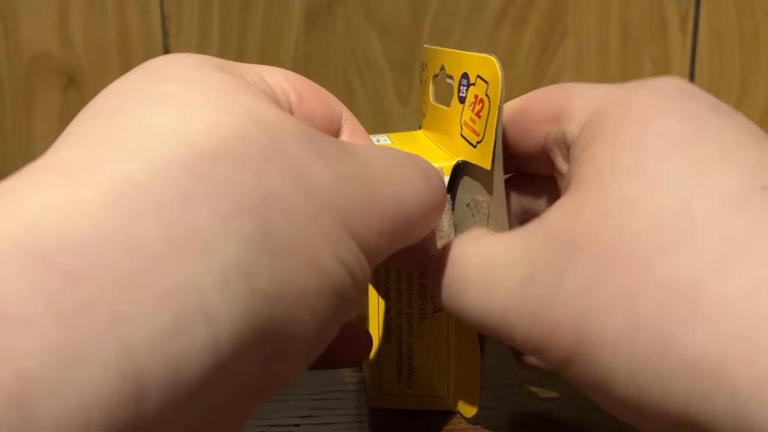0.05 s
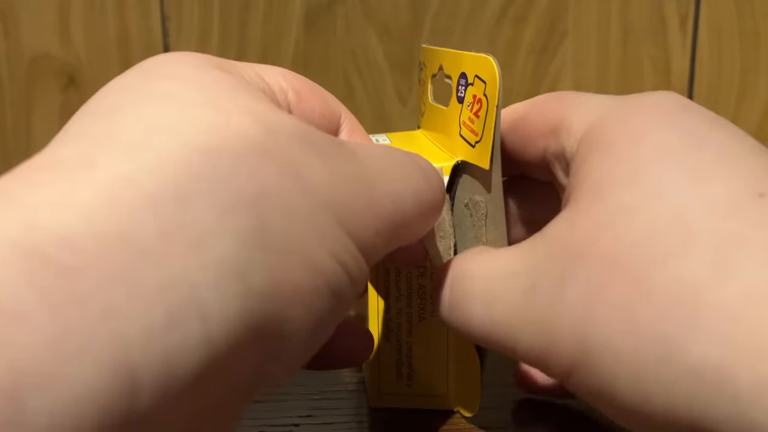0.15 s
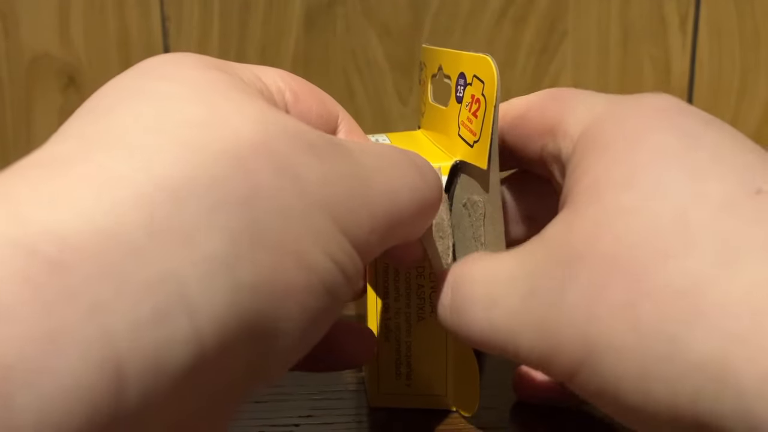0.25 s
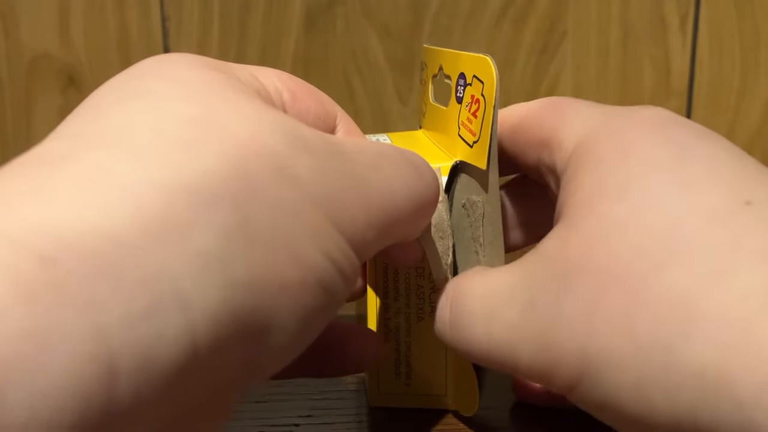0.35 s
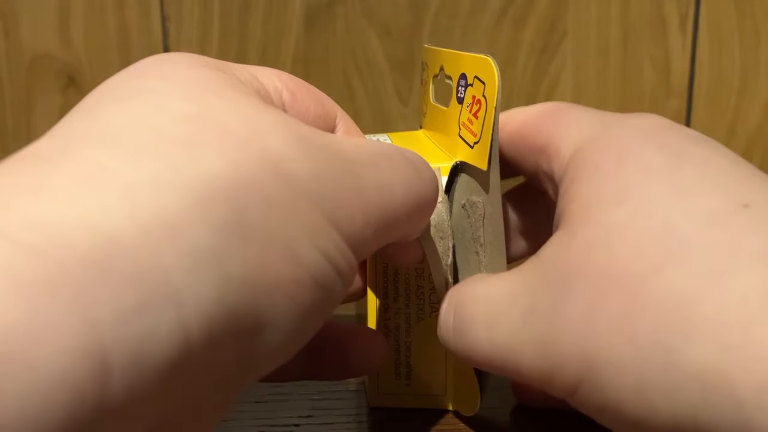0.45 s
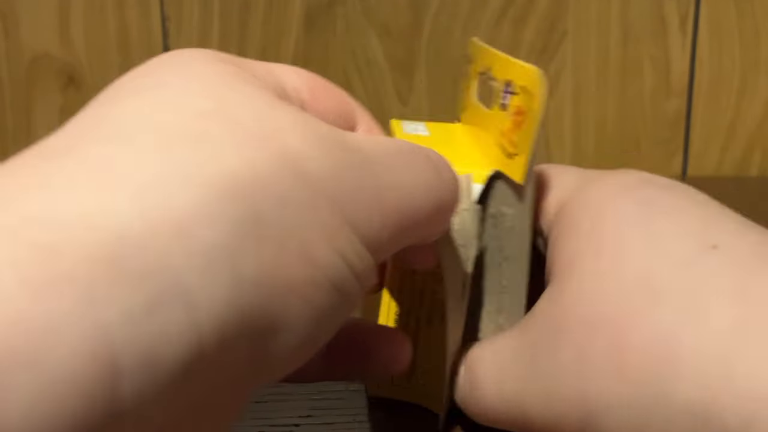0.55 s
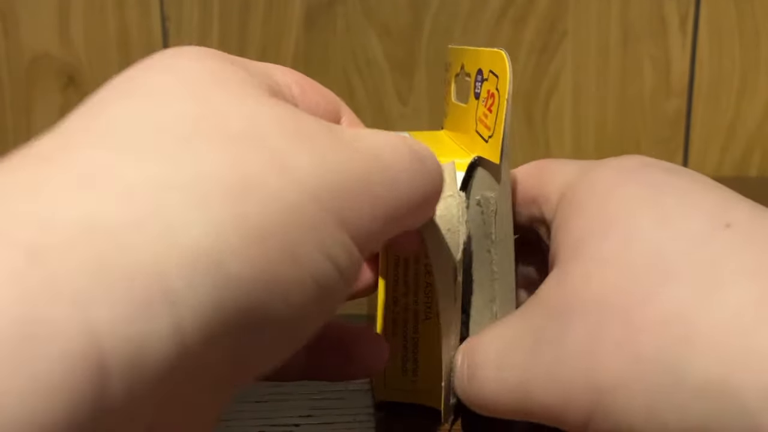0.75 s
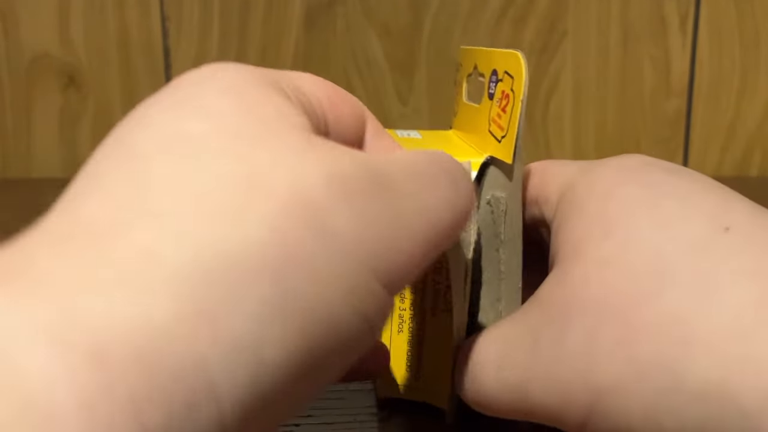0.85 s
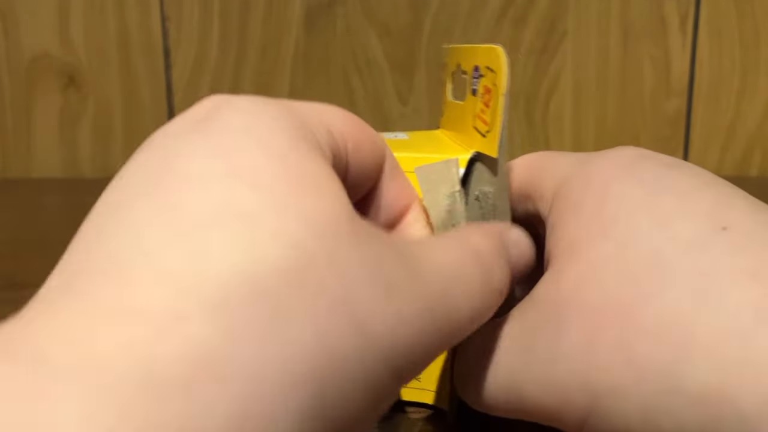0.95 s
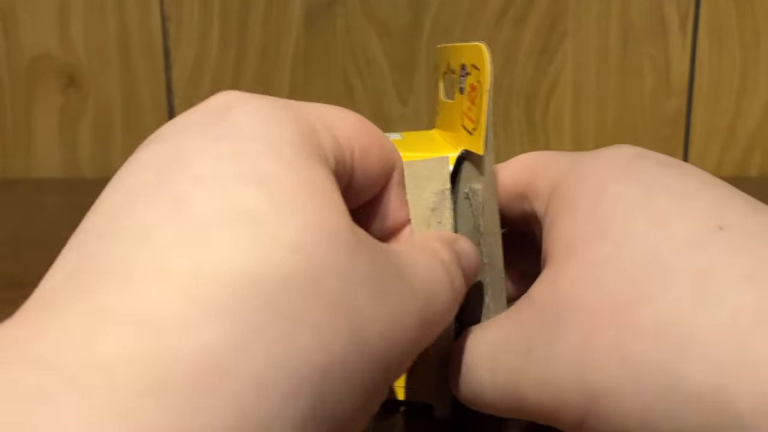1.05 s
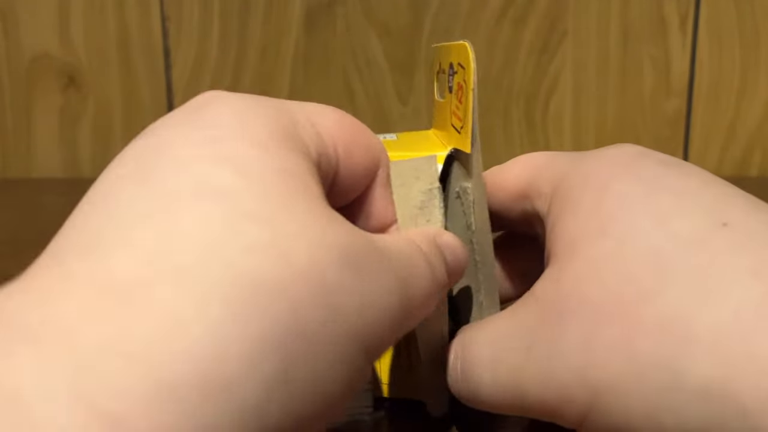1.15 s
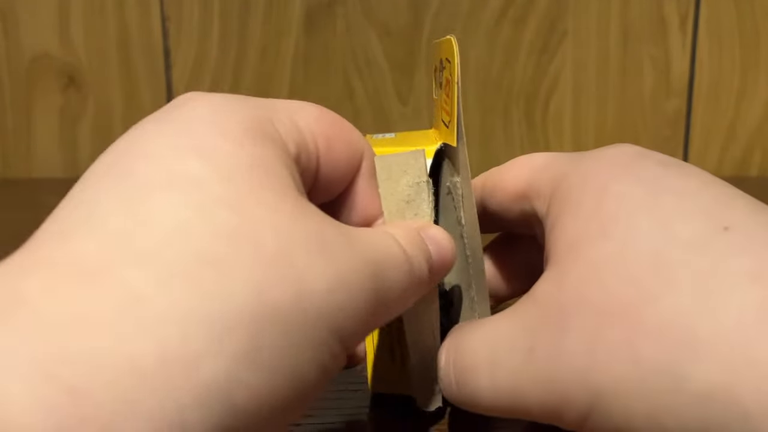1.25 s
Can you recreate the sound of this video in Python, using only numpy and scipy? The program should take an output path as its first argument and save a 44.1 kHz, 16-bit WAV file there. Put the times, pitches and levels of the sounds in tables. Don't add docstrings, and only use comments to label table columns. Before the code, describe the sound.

A small cardboard box is torn open by hand: dense papery crackle, scattered fibre snaps, a loud flap bang, then dull buckling pops and lighter ripping that fades, very close to a phone in a quiet room.

```python
import sys
import numpy as np
from scipy import signal
from scipy.fft import rfft, irfft, next_fast_len
from scipy.io import wavfile
from scipy.ndimage import map_coordinates

SR = 44100
rng = np.random.default_rng(int(sys.argv[2]) if len(sys.argv) > 2 else 0)


def wav_record(signal):
    frames = np.transpose(np.atleast_2d(signal))
    bounded = np.clip(frames, -1, 1)
    quanta = np.round(bounded * 32767).astype(np.int16)
    wavfile.write(sys.argv[1], SR, quanta)


def ratio_of_db(decibels):
    return 10 ** (np.asarray(decibels, float) / 20)


N = 57330


def unit(x):
    return x / np.sqrt(np.mean(x ** 2) + 1e-20)


def noise(length=N):
    return rng.standard_normal(length)


def clock(seconds):
    return np.arange(int(SR * seconds)) / SR


def along(points, hz):
    point_hz, value = np.transpose(points)
    return np.interp(np.log(hz + 1), np.log(point_hz + 1), value)


def curves(rows):
    seconds, *columns = np.transpose(rows)
    return [np.interp(np.arange(N) / SR, seconds, column) for column in columns]


def wobble(rate):
    knots = noise(int(N * rate / SR) + 4)
    return map_coordinates(knots, [np.arange(N) * rate / SR])


def filtered(x, response):
    size = next_fast_len(N + 8192)
    return irfft(rfft(x, size) * response(np.fft.rfftfreq(size, 1 / SR)), size)[..., :N]


def coloured(x, points):
    def gain(hz):
        return ratio_of_db(along(points, hz))
    return filtered(x, gain) / np.sqrt(np.mean(gain(np.linspace(0, SR / 2, 2048)) ** 2))


def grains(per_s, spread_db, life_s):
    sizes = ratio_of_db(spread_db * rng.exponential(size=N).clip(0, 2.6))
    kicks = (rng.random(N) < per_s / SR) * sizes
    gate = signal.lfilter([1], [1, -np.exp(-1 / (life_s * SR))], kicks)
    return unit(gate * noise())


def swell(rise_s, t):
    return 1 - np.exp(-(t / rise_s) ** 2)


def ring(hz, t60, rise_s, t):
    return ratio_of_db(-60 * t / t60) * swell(rise_s, t) * np.sin(2 * np.pi * hz * t)


def add(track, s, sound):
    part = track[round(s * SR):][:len(sound)]
    part += sound[:len(part)]


# (frequency [Hz], level [dB])
HUSH_COLOUR = [(30, -25), (100, -10.5), (400, -20), (1500, -22.5), (3000, -44), (8000, -58), (16000, -52)]
HUSH_DB = -67.5


def hush():
    return ratio_of_db(HUSH_DB) * coloured(noise(), HUSH_COLOUR)


# (frequency [Hz], time to fall 60 dB [s])
ROOM_DECAY = [(150, 0.14), (1000, 0.053), (4000, 0.062), (14000, 0.01)]
# (frequency [Hz], level [dB])
ROOM_LEVEL = [(100, -13), (1200, -13), (3500, -8), (8000, -13)]
# (frequency [Hz], level [dB])
ROOM_UNLIKE = [(300, -2), (5500, 4), (7500, -14)]


def room(x):
    hz, t, z = signal.stft(noise((3, SR // 4)), SR, nperseg=256)
    answers = z[0] + z[1:] * ratio_of_db(along(ROOM_UNLIKE, hz))[:, None]
    decay = ratio_of_db(-60 * t / along(ROOM_DECAY, hz)[:, None])
    tail = signal.istft(answers * decay, SR, nperseg=256)[1]
    tail = tail / np.linalg.norm(tail[0])
    delayed = np.pad(x, (60, 0))[None]
    wet = signal.fftconvolve(delayed, tail, axes=1)[:, :N]
    return filtered(wet, lambda f: ratio_of_db(along(ROOM_LEVEL, f)))


# (frequency [Hz], level [dB])
SCATTER = [(100, -9), (300, -15), (700, -8), (2500, -3), (5500, -1), (7500, -15)]


def unsteady_scatter(near):
    moving = near * np.array([wobble(120), wobble(120)])
    return filtered(moving, lambda hz: 1j * ratio_of_db(along(SCATTER, hz)))


# (frequency [Hz], phase lead [rad])
PORT_LEAD = [(0, 0), (1400, .55), (3300, 2.1), (4900, 2.9), (9200, -3.14), (13600, -9.4), (15300, -12.4),
             (22050, -12.6)]
# (frequency [Hz], level difference [dB])
PORT_LEAN = [(60, -3), (250, 1.2), (600, 3.2), (1200, 1), (3000, 1), (6500, -1), (12000, 0)]


def microphone_ports(x):
    side = np.array([[.5], [-.5]])

    def response(hz):
        phase = side * np.interp(hz, *np.transpose(PORT_LEAD))
        return ratio_of_db(side * along(PORT_LEAN, hz)) * np.exp(1j * phase)
    return filtered(x, response)


# (time [s], peak [dB], pitch [Hz])
THUMPS = [(.0, -43, 150), (0.031, -49, 104.4), (0.067, -53.5, 113), (0.218, -52, 119), (.27, -70, 55.7),
          (0.319, -50, 150), (0.35, -45.5, 95), (0.53, -62, 91), (.62, -54, 63.4), (0.773, -52.5, 150),
          (.89, -55, 130), (.975, -47, 94.4), (1.027, -44, 141.5), (1.049, -52, 75)]


def grip_thumps():
    out, t = np.zeros(N), clock(.25)
    for s, db, hz in THUMPS:
        add(out, s, ratio_of_db(db + 10) * ring(hz, 12.5 / hz, 1.23 / hz, t))
    return out


# (time [s], level [dB])
FLEXING = [(0, -42), (.062, -49), (.12, -83), (.19, -106), (.2, -45.5), (.27, -51), (.3, -106.5),
           (.325, -49.5), (.43, -50), (.49, -38), (.555, -46), (.63, -55), (.69, -63), (.8, -55),
           (.96, -57), (1.1, -65), (1.25, -60.5), (1.3, -63.5)]
# (frequency [Hz], level [dB])
CARD_COLOUR = [(200, -22.5), (340, -4), (520, -14), (850, -5), (1500, -6.5), (2300, -20), (4000, -21.5),
               (8000, -70)]
# (frequency [Hz], level [dB])
GRIP_COLOUR = [(30, -10), (80, 0), (150, -7), (400, -19.5)]
CREAKS_PER_S, CREAK_SPREAD_DB, CREAK_S = 360, 3, .0017
RUB_DB, SWELL_DB, GRIP_DB = -2, 1.5, -1.5


def flexing_card():
    flex_db, = curves(FLEXING)
    creaks = grains(CREAKS_PER_S, CREAK_SPREAD_DB, CREAK_S)
    rubbing = creaks + ratio_of_db(RUB_DB) * noise()
    panels = ratio_of_db(flex_db + SWELL_DB * wobble(80.9)) * coloured(rubbing, CARD_COLOUR)
    grip = ratio_of_db(flex_db + GRIP_DB) * unit(coloured(noise(), GRIP_COLOUR))
    return panels + grip


# (time [s], peak [dB], pitch [Hz], level of the box's low note [dB])
POPS = [(0.0949, -34.5, 1280, -20), (.198, -37, 834, -2), (0.3201, -30, 956, -36), (0.354, -36.5, 766, 9),
        (0.384, -30, 880, -4), (0.4159, -32, 850, 7.5), (0.429, -27, 1490, -8), (0.4742, -30, 700, -6),
        (0.479, -19, 860, -16), (.482, -18, 850, -8.5), (0.4844, -14, 1600, -9), (0.49, -29, 1280, -10),
        (.495, -27.5, 910, -10.5), (0.502, -31, 700, -8), (0.511, -21, 1548, -17), (.518, -30, 1490, -20),
        (.527, -32, 1430, -19), (0.5327, -18, 1616, -18), (.535, -24, 1200, -18), (.5375, -25, 1106, -11),
        (0.5705, -22.5, 2010, -16), (0.5713, -21, 4000, -20), (0.5734, -30, 1500, -13),
        (0.5884, -16, 1250, -17), (.611, -39, 1500, -9), (.6145, -40, 694, -12), (0.7, -41, 1580, -12),
        (0.707, -34, 1620, -16), (.761, -42, 1110, -10), (.794, -39, 1530, -12), (0.831, -31, 847, -23),
        (.871, -47, 1555, -12), (.898, -32, 1300, -8), (.9002, -34, 875, -4.5), (.9045, -39.5, 885, -1),
        (0.935, -34, 1100, -7), (.946, -40, 1450, -8), (0.9502, -35, 1460, -7), (.961, -38, 1580, -3),
        (.975, -39.5, 1390, -2), (1.0151, -37.5, 1026, -22), (1.0233, -33, 920, -3), (1.031, -39, 1780, -5),
        (1.071, -47, 600, -3), (1.132, -40.5, 786, 1.5), (1.183, -50, 506, 2), (1.223, -48.5, 694, 2),
        (1.259, -45.5, 1540, -10)]
# (frequency [Hz], level [dB], time to fall 60 dB [s])
BOX_NOTE = [(334, -1, 0.025), (150, -14.5, 0.077)]
POP_CYCLES, POP_RISE_S, POP_DB, POP_SPREAD = 10, .0015, -1, .3
SHIVER_DB, SHIVER_CYCLES, CLICK_DB, NOTE_LATE_S = -14, 30, -16, .003


def buckling_pops():
    out, t = np.zeros(N), clock(.25)
    low_note = sum(ratio_of_db(db) * ring(hz, t60, 0.63 / hz, t) for hz, db, t60 in BOX_NOTE)
    for s, db, hz, note_db in POPS:
        t60 = POP_CYCLES / hz
        detune = np.exp(POP_SPREAD * np.array([-1, -.4, .5, 1.1]) + .06 * noise(4))
        panel = ring(hz, t60, POP_RISE_S, t)
        for ratio in detune:
            panel += 0.59 * rng.choice([-1, 1]) * ring(hz * ratio, t60, POP_RISE_S, t)
        jolt = noise(len(t))
        around_pitch = signal.butter(1, [hz * .6, hz * 1.6], 'band', fs=SR)
        shiver = unit(signal.lfilter(*around_pitch, jolt))
        shiver *= ratio_of_db(SHIVER_DB - 60 * t * hz / SHIVER_CYCLES) * (1 - np.exp(-t / POP_RISE_S))
        click = signal.lfilter(*signal.butter(2, hz * 2.5, fs=SR), jolt)
        click *= ratio_of_db(CLICK_DB - 60 * t / .004)
        add(out, s, ratio_of_db(db + POP_DB) * (panel / abs(panel).max() + shiver + click))
        add(out, s + NOTE_LATE_S, ratio_of_db(db + note_db) * low_note)
    return out


# (time [s], frequency [Hz], peak [dB], time to fall 60 dB [s])
FLAP = [
    (0.4516, 2500, -20, 0.006),
    (.4516, 4300, -15, 0.0059),
    (.451, 1560, -5.5, 0.0047),
    (0.4522, 935, -3, 0.0094),
    (.452, 718, -14.5, 0.029),
    (0.4532, 335, -7.5, 0.021),
    (.459, 1050, -4.5, 0.005),
    (.454, 149, -22, 0.0545),
    (.46, 78, -33, 0.075),
]
CRACK_DB, CRACK_T60_S, CRACK_HZ = -20, .016, 2500


def flap():
    out, crack, t = np.zeros(N), np.zeros(N), clock(.25)
    for s, hz, db, t60 in FLAP:
        add(out, s, ratio_of_db(db + 4.5) * ring(hz, t60, 0.5 / hz, t))
    add(crack, FLAP[0][0], ratio_of_db(CRACK_DB - 60 * t / CRACK_T60_S) * noise(len(t)))

    def dull(hz):
        return 1j * hz / (600 + 1j * hz) / (1 + 1j * hz / CRACK_HZ) ** 2
    return out + filtered(crack, dull)


# (time [s], level [dB], brightness [dB], share of sparse ticks [0-1])
TEARING = [(0, -35.5, 0.5, 0.34), (.062, -32.5, 2, 0.34), (.085, -56.5, 2, 0.2), (.19, -70.5, -2, 0.1),
           (.198, -41, 1.5, 0.16), (.265, -36.5, 4, 0.1), (.285, -53, 1.5, 0.8), (.436, -38, 7.5, 0.2),
           (.448, -26, 4, 0), (.46, -34.5, -7, 0), (.56, -100, -4, .4), (.62, -60, 2.5, 0),
           (.8, -43, 8, 0.15), (.96, -50.5, 5, 0.2), (1.0, -63, 7, 0), (1.04, -50, 3, 0.12),
           (1.1, -85, 16, 1), (1.26, -82, 20, .1)]
FIBRES_PER_S, FIBRE_S, CLUMP_DB = 3500, .00056, 2
TICKS_PER_S, TICK_S, TICK_SPREAD_DB, HISS_DB = 400, .0006, 2, -3


def tearing_crackle():
    level_db, bright_db, sparse = curves(TEARING)
    sparse = sparse.clip(0, 1)
    rasp = ratio_of_db(CLUMP_DB * wobble(200)) * grains(FIBRES_PER_S, 3, FIBRE_S)
    ticks = grains(TICKS_PER_S, TICK_SPREAD_DB, TICK_S) + ratio_of_db(HISS_DB) * noise()
    return ratio_of_db(level_db) * (np.sqrt(1 - sparse) * rasp + np.sqrt(sparse) * ticks), bright_db


# (time [s], peak [dB], brightness [dB], time to fall 60 dB [s])
SNAPS = [(0.0949, -11.5, 5.5, 0.0058), (0.161, -30, 0, 0.0027), (0.1731, -30, 2.5, 0.0053),
         (0.196, -29, 12, 0.0081), (0.2006, -23, 5, 0.0081), (0.2067, -16.5, 7, 0.0079),
         (0.2166, -20, 23, 0.011), (0.227, -11.5, 4.5, 0.0081), (0.2752, -25, 0.5, 0.0035),
         (0.3004, -28.5, 7, 0.014), (0.4093, -17, 15, 0.0052), (0.4155, -23.5, 5, 0.0075),
         (0.441, -21, 6, 0.012), (0.45, -6, 7.5, 0.0085), (0.5703, -28, -4, 0.0085),
         (0.5894, -38, -6.5, 0.0065), (0.688, -28, 6, 0.0062), (0.706, -23, 6.5, 0.0077),
         (0.7486, -26, 10, 0.005), (0.7685, -29, 6, 0.0083), (0.781, -29, 20, 0.016),
         (0.7932, -24.5, 7, 0.0098), (0.845, -16, 9.5, 0.0075), (0.8715, -16, 7.5, 0.006),
         (0.911, -27.5, 13, 0.014), (0.918, -22, 6, 0.008), (1.0624, -47, -1, 0.0051)]
# (time [s], peak [dB], brightness [dB])
MORE_SNAPS = [(.0134, -27, 7), (.0274, -21, 5), (0.0322, -23, 9), (.042, -25, 5), (.054, -28, 7),
              (0.0562, -21, 3), (.170, -41, 6), (0.2453, -24, 5), (0.261, -31, 1), (.268, -36, 3),
              (.313, -34, 6), (.3345, -33, 3), (0.3735, -34, 3), (.378, -27, 3), (.3925, -32, 6), (.401, -25, 5),
              (0.4297, -24, 8), (.637, -38, 5), (0.6835, -36, 6), (.693, -35, 5), (.724, -34, 1), (.756, -37, 5),
              (0.7615, -33, 12), (0.7746, -31, 10), (.7836, -30, 12), (.7952, -24, 5), (.811, -30, 10),
              (.8175, -30, 10), (0.8265, -31, 10), (.9548, -34, 3), (0.9649, -35, 2), (1.0196, -38, 8),
              (1.1326, -50, 8)]
# (frequency [Hz], level [dB])
FIBRE_COLOUR = [(700, -30), (1500, -1), (3500, -6), (6800, 0.5), (8600, -0.5), (10500, 1.5), (12500, -0.5),
                (15500, -4.5)]
MORE_SNAPS_T60_S, SNAP_RISE_S = .0058, .00062


def fibres():
    crackle, bright_db = tearing_crackle()
    high, low, t = crackle.copy(), crackle * ratio_of_db(-bright_db), clock(.05)
    for s, db, bright, t60 in [*SNAPS, *[(*tick, MORE_SNAPS_T60_S) for tick in MORE_SNAPS]]:
        shape = ratio_of_db(-60 * t / t60) * swell(SNAP_RISE_S, t)
        burst = shape * noise(len(t))
        burst *= ratio_of_db(db + 4) * np.linalg.norm(shape) / np.linalg.norm(burst)
        add(high, s, burst)
        add(low, s, burst * ratio_of_db(-bright))

    def high_share(hz):
        return np.clip(np.log2((hz + 1) / 6000), 0, 1)
    both = filtered(high, high_share) + filtered(low, lambda hz: 1 - high_share(hz))
    return coloured(both, FIBRE_COLOUR)


def scene():
    box = grip_thumps() + flexing_card() + buckling_pops() + flap() + fibres()
    near = box + hush()
    return microphone_ports(near + unsteady_scatter(near) + room(box))


def band_limit(x):
    return signal.sosfilt(signal.butter(12, 17100, fs=SR, output="sos"), x)


def record(dry):
    low_hz, top_hz = 58, 15900

    def band(hz):
        return (1j * hz / (low_hz + 1j * hz)) ** 2 / (1 + (hz / top_hz) ** 90)
    return band_limit(filtered(dry, band))


dry = scene()
out = record(dry)
wav_record(out)
```